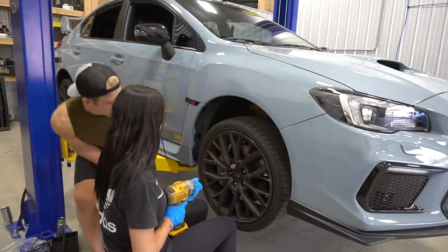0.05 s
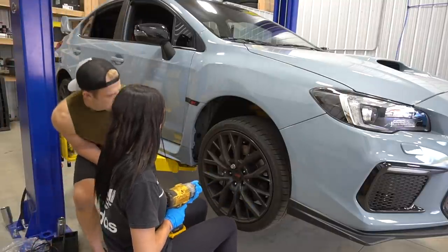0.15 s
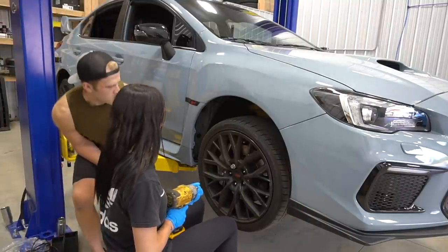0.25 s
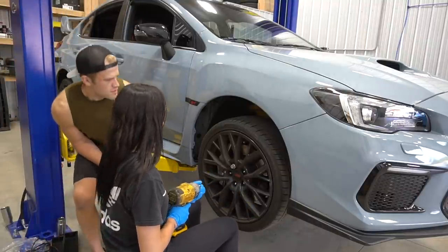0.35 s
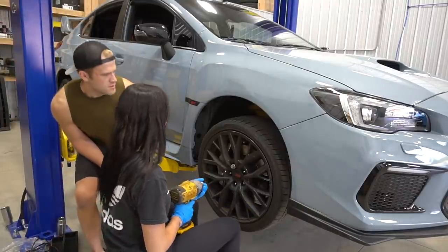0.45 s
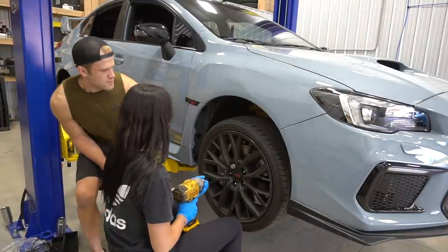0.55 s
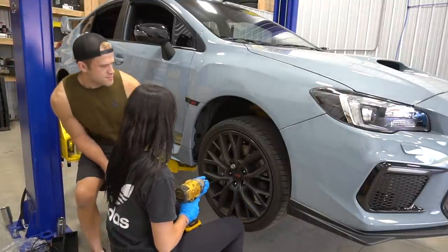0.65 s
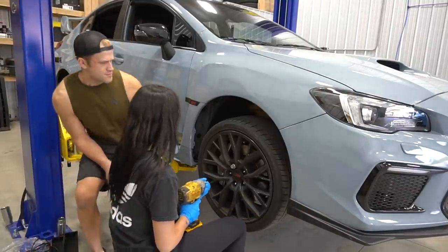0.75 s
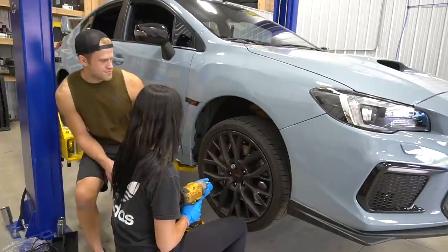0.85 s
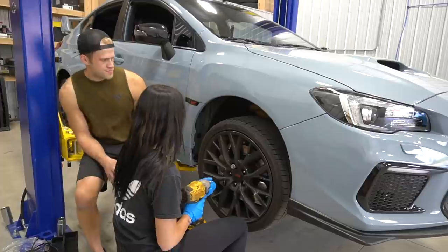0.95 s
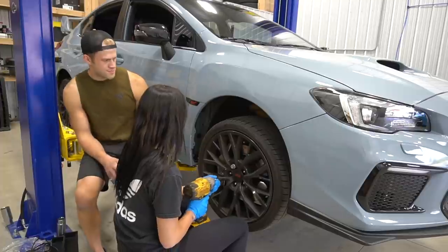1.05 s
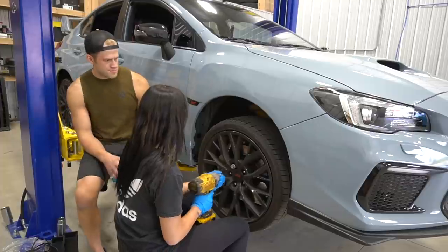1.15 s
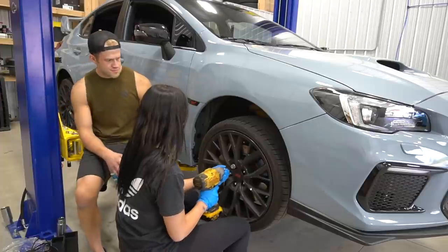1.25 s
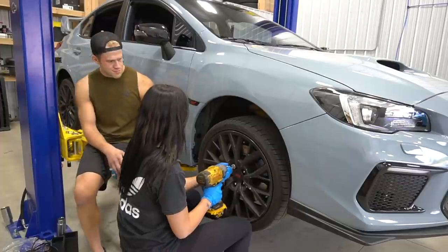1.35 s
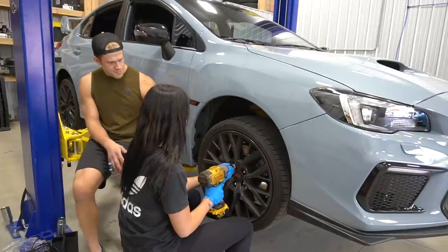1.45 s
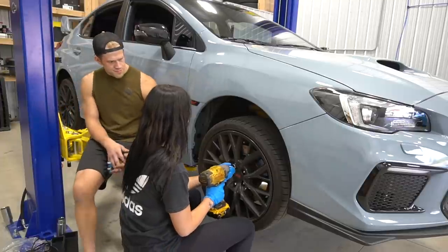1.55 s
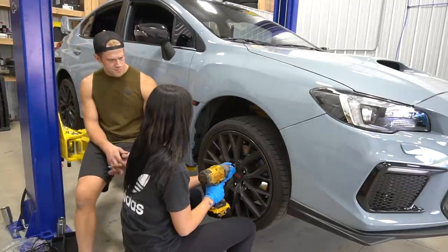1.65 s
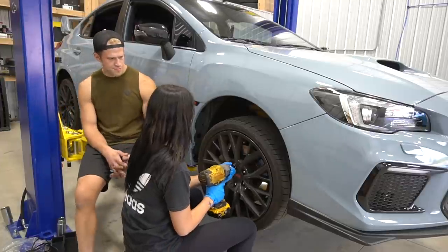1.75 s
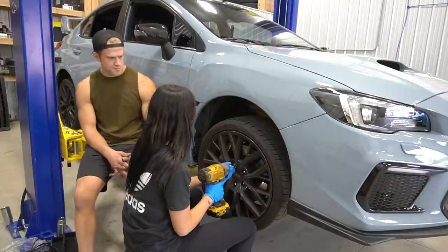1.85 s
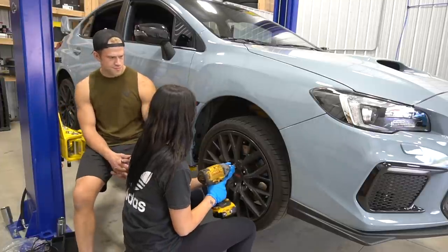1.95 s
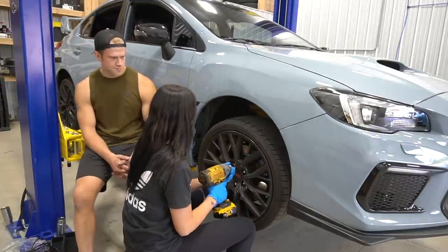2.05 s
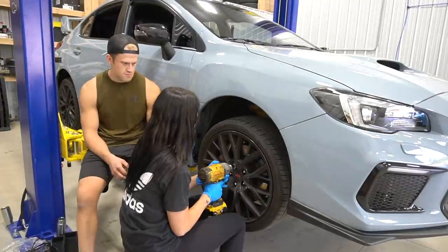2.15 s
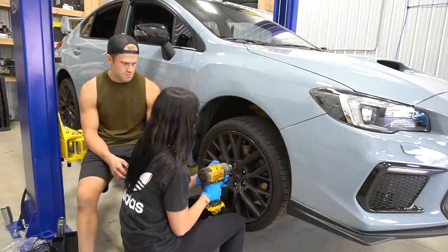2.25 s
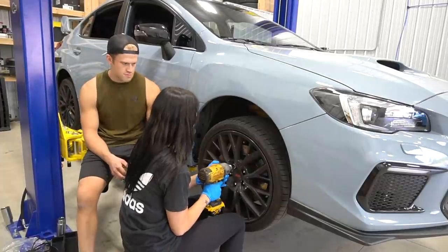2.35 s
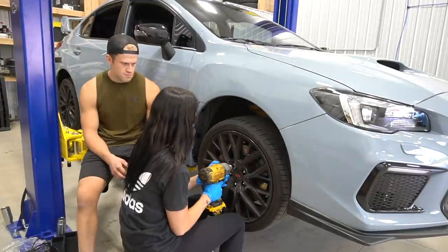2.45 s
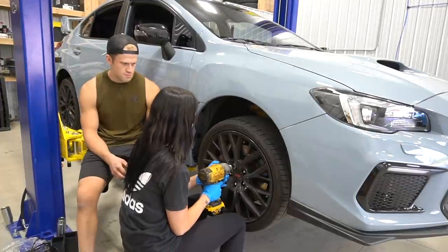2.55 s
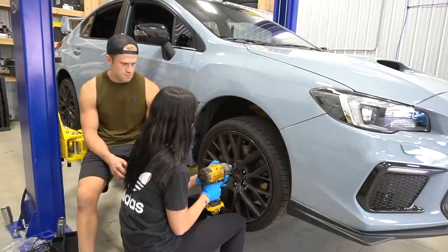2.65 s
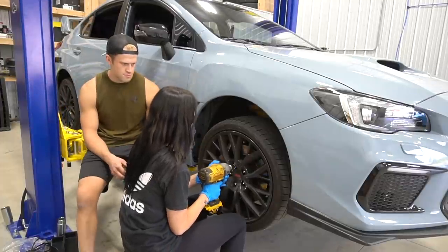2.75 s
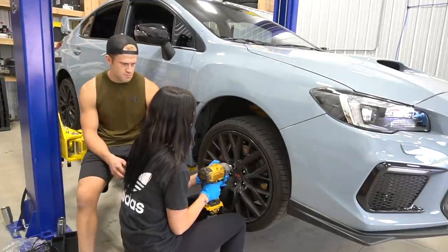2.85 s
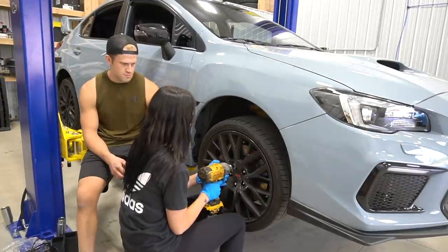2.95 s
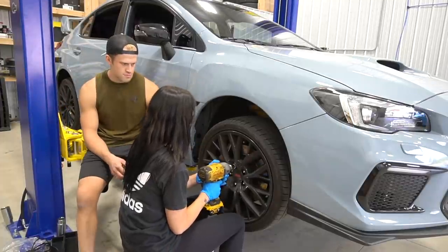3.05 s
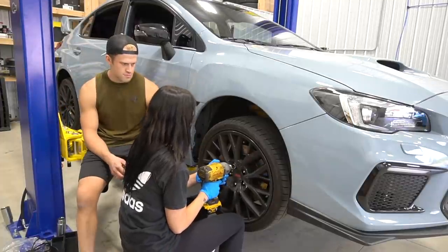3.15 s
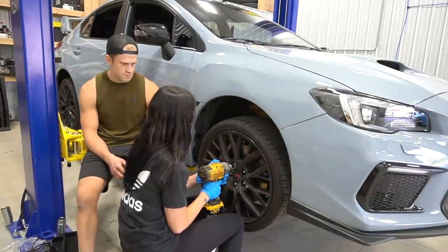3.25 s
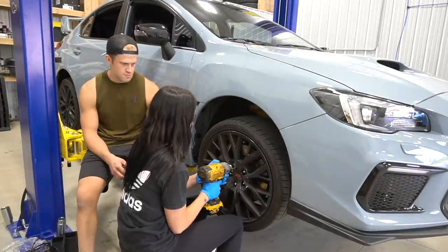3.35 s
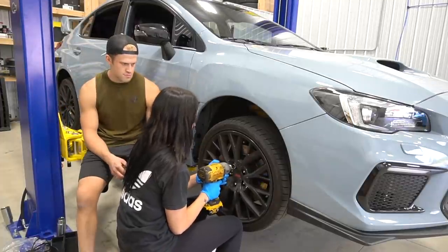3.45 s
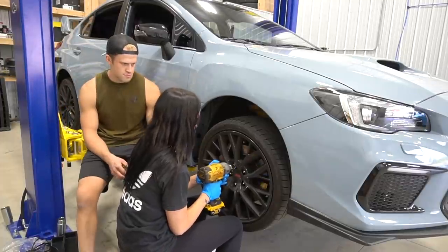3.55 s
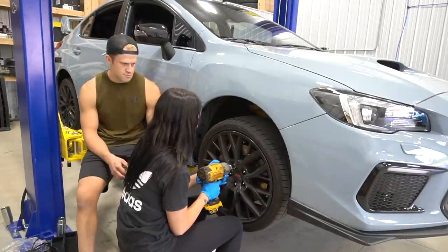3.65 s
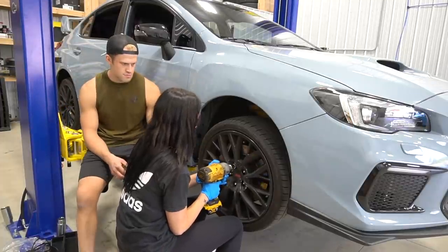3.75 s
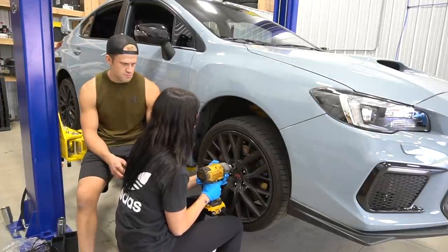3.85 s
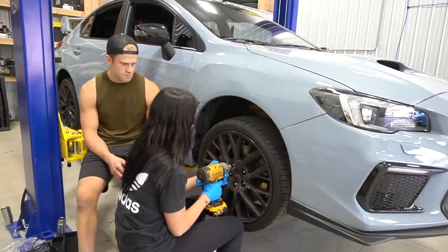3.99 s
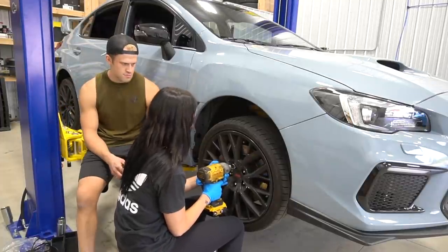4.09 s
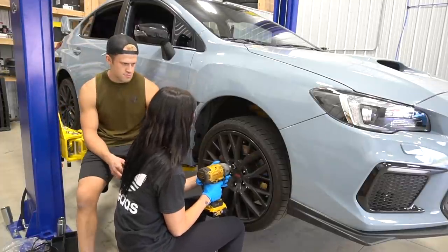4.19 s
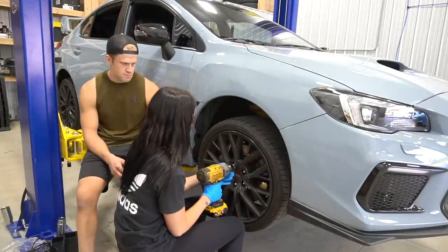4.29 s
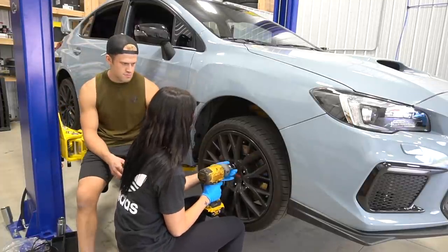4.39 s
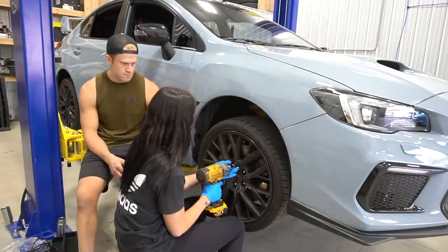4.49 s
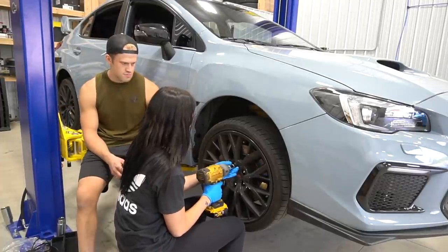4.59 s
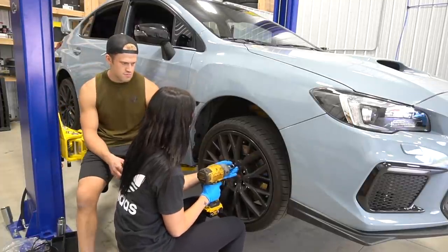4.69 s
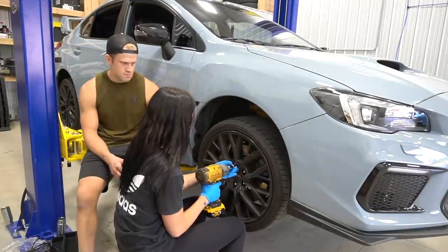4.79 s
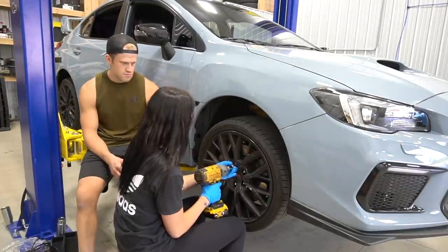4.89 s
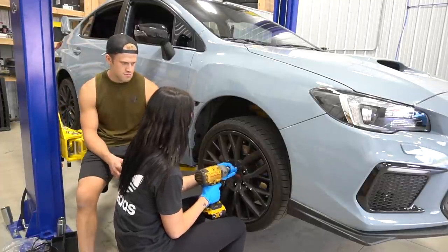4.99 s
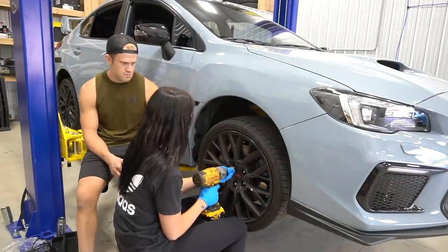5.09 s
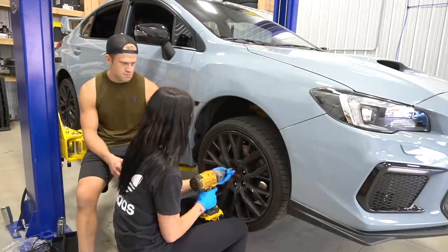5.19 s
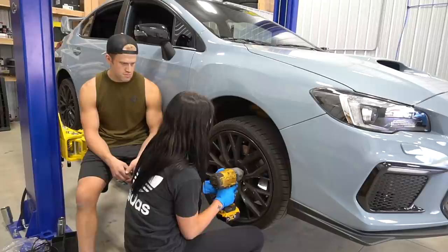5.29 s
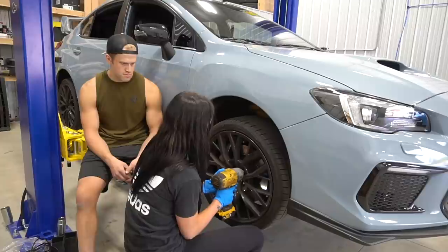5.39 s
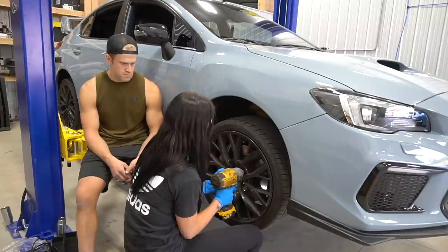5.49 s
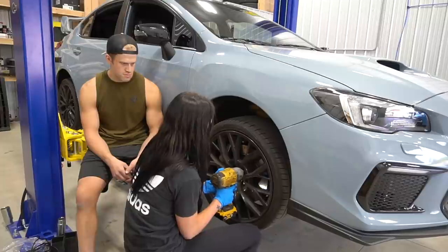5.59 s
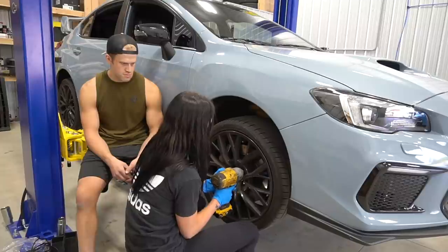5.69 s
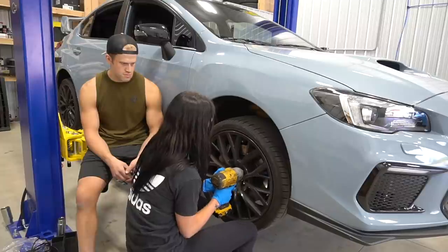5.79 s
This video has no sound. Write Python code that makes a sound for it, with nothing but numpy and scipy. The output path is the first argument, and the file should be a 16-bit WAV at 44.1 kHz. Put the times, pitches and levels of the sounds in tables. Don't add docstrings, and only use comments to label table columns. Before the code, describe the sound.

In a hard-walled garage, an impact wrench hammers wheel nuts in three loud rattling bursts, between ringing metal, small tool knocks and socket scrapes.

```python
import sys
import numpy as np
from scipy import signal
from scipy.fft import rfft, irfft, next_fast_len
from scipy.io import wavfile
from scipy.ndimage import uniform_filter1d

SR = 44100
rng = np.random.default_rng(int(sys.argv[2]) if len(sys.argv) > 2 else 0)


def digitize_waveform(pressure):
    field = np.atleast_2d(pressure).T
    bounded = np.clip(field, -1, 1)
    quanta = np.round(bounded * 32767).astype(np.int16)
    wavfile.write(sys.argv[1], SR, quanta)


def convert_level_to_amplitude(level_db):
    exponent = np.asarray(level_db, float) / 20
    return 10 ** exponent


N = 257103

# start_s, peak_db, brightness_db, socket_ring_hz
FIRST_BURST = [(2.346, -20.5, -16, 1510), (2.354, -21.5, -32, 2480), (2.383, -18, -20, 2670),
               (2.395, -4, -3, 4270), (2.412, -19, -12, 4400), (2.4278, -11, -17, 4940),
               (2.444, -9.5, -0.5, 4080), (2.457, -5, -10, 3350), (2.475, -7, -8, 2440),
               (2.484, -9, -14, 3170), (2.493, -15, 2, 3340), (2.5056, -7.5, -9, 3290),
               (2.524, -5.5, -11, 3170), (2.5369, -6.5, -2.5, 3280), (2.5501, -8.5, -8, 2440),
               (2.5672, -3, -11, 2960), (2.5798, -6.5, -7, 3410), (2.587, -5, -6, 2510),
               (2.596, -9, -8, 2890), (2.6196, -7, -2, 3010), (2.6325, -8, -14, 3350),
               (2.646, -7.5, -2, 3280), (2.665, -14.5, -25, 4600), (2.691, -10, -28, 4500)]
# start_s, peak_db, brightness_db, socket_ring_hz
SECOND_BURST = [(3.195, -13, -18, 2330), (3.238, -1.5, -12.5, 4450), (3.2582, -7.5, -4, 3370),
                (3.2805, -8.5, -3, 3330), (3.2901, -9, -5, 3080), (3.3107, -2.5, -13.5, 3990),
                (3.3243, -8, -8, 3280), (3.338, -5.5, -7, 4660), (3.359, -8.5, 0, 2390),
                (3.3705, -15, -5, 3280), (3.3785, -7, -8.5, 2430), (3.387, -24, -5, 2520),
                (3.408, -12, 2, 1640), (3.42, -8, -13.5, 1990), (3.429, -4, -9.5, 2560),
                (3.4355, -10.5, -6.5, 3020), (3.46, -5.5, -10, 2210), (3.473, -12, -20, 2620),
                (3.482, -5, -3.5, 3070), (3.493, -3.5, -9, 3090), (3.5149, -2.5, -12, 3500),
                (3.529, -5, -13, 2700), (3.537, -9, -1, 3170), (3.546, -11, -5.5, 2450),
                (3.5683, -14.5, 3.5, 3040), (3.5814, -6.5, -15, 3050), (3.595, -5.5, -6, 3060),
                (3.608, -17, -6, 2420), (3.631, -9, -12, 3980)]
# start_s, peak_db, brightness_db, socket_ring_hz
LOOSENING_BLOWS = [(3.673, -2, -8, 4470), (3.702, -5.5, -3, 3240), (3.7114, -8.5, -1, 4940),
                   (3.737, -14, 7, 4400), (3.745, -2.5, -10, 2260), (3.7757, -2.5, -8, 4460),
                   (3.802, -3.5, -9.5, 4150), (3.8293, -3, -11.5, 2190), (3.8592, -4.5, -9.5, 5060),
                   (3.895, -9, -8, 1600)]
# start_s, peak_db, brightness_db, socket_ring_hz
THIRD_BURST = [(5.392, -16.5, -15, 3040), (5.427, -9, -17.5, 2300), (5.459, -3.5, -4, 3430),
               (5.4758, -10, 0, 3260), (5.4865, -11, -6, 2300), (5.491, -26.5, 17, 2600),
               (5.5004, -8.5, -4, 3470), (5.516, -18, 6, 2130), (5.534, -10.5, 0, 2770),
               (5.542, -5, -10, 3100), (5.56, -16.5, 8, 3250), (5.577, -7.5, -7, 2430),
               (5.5845, -16, 8, 2570), (5.607, -4.5, -10, 2000), (5.618, -26, 8, 2020),
               (5.6288, -5.5, -4.5, 3150), (5.64, -25, -10, 2010), (5.652, -8, -12, 4000),
               (5.668, -4.5, -4, 4340), (5.683, -5.5, -9, 4260)]
# start_s, peak_db, brightness_db,
# socket_ring_hz
FURTHER_BLOWS = [(2.399, -22, -1, 2600), (2.4005, -22, -10, 4300), (2.4167, -4, -8, 4620),
                 (2.463, -7.5, -10, 3600), (2.4776, -6.5, -9, 2190), (2.509, -10, -10, 2720),
                 (2.528, -10.5, -12, 3300), (2.6938, -7, -23, 4200), (3.229, -23.5, -16, 2530),
                 (3.33, -6, -8, 3300), (3.438, -12, 0, 3100), (2.599, -13, -5, 2800),
                 (3.242, -2, -12, 3300), (3.677, -5, -9, 2300), (3.682, -9, -13, 4200),
                 (3.7393, -12, -2, 2820), (3.777, -19, -13, 4300), (3.805, -7, -4.5, 2240),
                 (3.832, -24, 9, 3600), (3.896, -11, -17, 2300), (5.5299, -8.5, -7, 3100),
                 (5.573, -10, -14, 2270), (5.687, -8, -15, 2450), (2.679, -15.5, -19, 3000),
                 (2.6998, -10, -22, 3500), (2.708, -21, -17, 3340), (3.2693, -7, -16, 3320),
                 (3.2723, -7.5, -8, 3550), (3.314, -12, -5.5, 3900), (3.3666, -8.5, -12, 3500),
                 (3.518, -13.5, -9, 2800), (3.586, -8, -19, 2950), (3.589, -15.5, -16, 3200),
                 (3.694, -16, -21, 2300), (3.733, -10, -20, 2480), (3.751, -6, -17, 3740),
                 (3.8366, -15, -17, 2580), (3.887, -9.5, -14, 2570), (5.4453, -13, -25, 2800),
                 (5.452, -18, -26, 2970), (5.6935, -11, -12, 3180), (5.748, -8, -24, 2500)]
# pitch_hz, level_db
CRACK_COLOUR = [(60, -56), (200, -20.5), (500, -9.5), (1200, -5), (3000, -5), (5000, -3), (7000, -5.5),
                (16000, -25)]
# start_s, peak_db, ring_hz
ANVIL_PINGS = [(2.401, -22, 14300), (2.497, -20, 14000), (2.632, -22, 14300), (3.326, -24, 12500),
               (3.44, -18.5, 9800), (3.501, -19, 14400), (3.548, -17, 9800), (5.587, -23, 10000),
               (5.686, -17, 14500)]
# pitch_hz, level_db, t60_s
WHEEL_MODES = [(288, -11.5, 0.37), (420, -18, 0.11), (455.7, 0.5, 0.16), (687, -24, 0.76),
               (846.6, -5.5, 0.14), (956, -12.5, 0.12), (1080, -14.5, 0.078), (1600, -14.5, 0.33),
               (1950, -19, 0.78), (2020, -15.5, 0.2), (2250, -27, 0.39), (2530, -14, 0.23),
               (3280, -12, 0.043)]
# on_s, off_s, gear_db, gain_duck_db, run_down_s, gear_treble_db
TRIGGER_PULLS = [
    (2.336, 2.4, -34.5, 12, 0.013, -26),
    (2.394, 2.648, -24, 0.5, 0.047, -6.5),
    (2.676, 2.691, -21.5, -0.5, 0.11, -12),
    (3.183, 3.247, -31.5, -2.5, 0.015, -36),
    (3.242, 3.65, -23.5, 8, 0.075, -8),
    (3.647, 3.882, -26.5, 4.5, 0.14, -16.5),
    (5.389, 5.46, -30, 8, 0.01, -20),
    (5.45, 5.638, -24, -1, 0.62, -6.5),
]
# start_s, peak_below_6500_hz_db, peak_above_db, ring_hz, length_ms
SMALL_KNOCKS = [(0.2425, -37, -44, 3190, 1.1), (0.298, -40, -56, 2580, 1.1), (0.5304, -48, -51, 2020, 0.5),
                (0.6015, -34, -59, 330, 3.5), (0.8579, -50, -72, 260, 2.3), (1.0366, -39, -66, 900, 1.5),
                (1.2973, -38, -60, 700, 1.3), (1.5851, -28, -36, 4910, 1.5), (1.5855, -34, -65, 1900, 1.5),
                (1.6076, -37, -61, 1790, 0.8), (1.7059, -31, -57, 650, 1.5), (1.7375, -31, -70, 330, 5.5),
                (1.589, -34, -60, 4870, 6.5), (0.3, -42, -70, 750, 5.5), (1.7361, -23, -28, 2450, 2.7),
                (2.01, -31, -46, 3200, 1.6), (5.048, -43, -75, 400, 4), (2.3023, -45, -69, 3400, 2.7),
                (2.3273, -37, -70, 3340, 2.3), (4.43, -34, -58, 3290, 2.6), (4.4988, -31, -39, 4740, 2.0),
                (4.6313, -36, -42, 2390, 1.7), (4.729, -31, -42, 3190, 1.5), (4.9164, -29, -36, 2950, 2.0),
                (5.0514, -25, -28, 3290, 1.5), (5.0658, -32, -30, 6480, 1.7), (5.1546, -43, -38, 3230, 0.9),
                (5.3654, -41, -72, 3490, 1.8), (5.3862, -38, -64, 3490, 3.7)]
# start_s, peak_db, ring_hz
SOCKET_TICKS = [(0.1902, -41, 8700), (0.2524, -38, 9100), (4.4524, -43, 9370), (4.485, -36, 9050),
                (4.7222, -37, 9440), (4.7526, -35, 9390), (4.7654, -34, 14300), (4.775, -28, 8000),
                (4.7994, -32, 8700), (4.8214, -40, 9030), (4.8299, -30, 14600), (4.844, -36, 9570),
                (4.8574, -32, 9100), (4.8674, -31, 8370), (4.8874, -29, 8500), (4.9074, -36, 9300),
                (4.9644, -44, 9100), (5.015, -46, 9400), (5.033, -36, 14700), (5.112, -36, 8850),
                (5.1744, -54, 9100)]
# loudest_s, level_db, rise_s, fall_s
SOCKET_SCRAPES = [
    (2.301, -50.5, 0.0034, 0.085),
    (4.45, -40, 0.057, 0.025),
    (4.51, -37.5, 0.043, 0.059),
    (4.72, -39.5, 0.038, 0.063),
    (4.795, -38, 0.067, 0.044),
    (4.86, -36, 0.082, 0.17),
    (5.05, -39, 0.0055, 0.061),
    (5.2, -67, 0.36, 0.063),
]
# time_s, effort_db
HAND_SHUFFLE = [(0, -39.5), (.2, -46.5), (.3, -45), (.454, -51), (.55, -47), (.736, -58.5), (1.03, -63),
                (1.47, -54), (1.52, -46.5), (1.66, -42), (1.715, -49.5), (1.74, -28.5), (1.77, -41),
                (1.92, -46.5), (2.08, -51.5), (2.13, -48.5), (2.22, -54.5)]
# loudest_s, level_db, rise_s, fall_s
GLOVE_BRUSHES = [
    (.02, -54, 0.038, 0.12),
    (.27, -59, 0.058, 0.026),
    (.57, -50, 0.05, 0.06),
    (1.51, -55.5, 0.037, 0.039),
    (1.75, -60, 0.0041, 0.061),
]
# start_s, pitch_hz, width_hz, level_db, t60_s
STEEL_RINGS = [(-.2, 2635, 95, -24, 1.18), (-.1, 4700, 250, -45.5, 1.8), (-.05, 486, 82, -56, 2),
               (-.1, 1230, 50, -39, 0.58), (-.1, 6000, 120, -50, 1.7), (-.1, 6660, 90, -49, 1.6),
               (-.1, 9300, 810, -38, 0.85), (.58, 420, 170, -46, 0.54), (5.352, 338, 130, -50, .6),
               (4.66, 3300, 500, -34, 1.1), (1.05, 6540, 76, -63.5, 2.3), (1.57, 4900, 150, -44, 0.27),
               (1.7, 322, 71, -45, 0.41), (1.74, 1760, 260, -35, 0.65), (1.74, 440, 30, -43.5, 0.65),
               (2.293, 3360, 350, -40, 0.82), (2.345, 834, 160, -34, 0.82), (2.34, 430, 81, -37, 0.69),
               (2.7, 214, 19, -48, 1.02), (3.82, 1584, 28, -26.5, 0.92), (3.85, 2450, 45, -40, 1.2),
               (3.85, 2080, 30, -42, 0.96), (4.2, 519, 11, -52, 1.7), (4.3, 1102, 110, -48, 1.7),
               (4.68, 930, 170, -40.5, 0.92)]
# start_s, pitch_hz, width_hz, level_db, rise_s
DRAGGED_RINGS = [
    (1.08, 2060, 140, -46.5, 0.5),
    (0.82, 2150, 250, -58, 0.18),
    (1.24, 860, 150, -54.5, 0.16),
    (1.23, 300, 35, -58.5, 0.15),
    (1.1, 3500, 250, -65, 0.37),
    (0.95, 3160, 200, -64, 0.28),
]
# loudest_s, level_db, rise_s, fall_s
THUMPS = [(.1, -62, 0.051, 0.027), (.41, -71, 0.031, 0.048), (.6, -56, 0.015, 0.15),
          (1.12, -65, 0.075, 0.13), (2.15, -75, 0.088, .05), (2.36, -62, 0.043, .05),
          (1.77, -48.5, 0.074, 0.17), (2.57, -48, 0.05, 0.033), (2.74, -48, 0.032, 0.1),
          (3.31, -44, 0.021, 0.29), (3.93, -49.5, 0.16, 0.09), (4.35, -67, 0.04, 0.13),
          (5.4, -68.5, 0.046, 0.049), (5.72, -50, 0.022, 0.023)]
RUMBLE_BY_SHOT = (-65.5, -75, -54.5)
# pitch_hz, level_db
AIR_COLOUR = [(100, -60), (200, -3.5), (500, -5), (1500, -9.5), (4000, -24.5), (6000, -17.5), (16000, -17)]
# start_s, end_s, floor_db, room_db
SHOT_LIST = [
    (0, 2.216, -57.5, -14),
    (2.216, 5.352, -78, -5),
    (5.352, 5.84, -71, -6),
]
# pitch_hz, t60_s
GARAGE_T60 = [(100, 0.32), (400, 0.8), (1500, 1.14), (3500, 1.37), (6000, 0.92), (10000, 0.51),
              (12500, 0.31), (16000, 0.19)]
# pitch_hz, likeness_0_to_1
CHANNEL_LIKENESS = [(100, .985), (400, .988), (700, .92), (1400, .84), (3000, .53), (6000, .24),
                    (10000, .22), (14000, .45)]
# pitch_hz, left_minus_right_db
STEREO_LEAN = [(60, -.5), (110, -2.2), (200, -1.0), (380, -2.5), (700, 0), (1290, -0.5), (2380, -1),
               (4400, 0.5), (8120, 2), (15000, 0.5)]

TIME_S = np.arange(N) / SR


def hammer_blows():
    arrival_s = .0013
    contact_ms, contact_spread = 0.98, 0.069
    table = FIRST_BURST + SECOND_BURST + LOOSENING_BLOWS + THIRD_BURST + FURTHER_BLOWS
    s, db, bright_db, hz = np.transpose(table)
    length_ms = contact_ms * np.exp(contact_spread * rng.standard_normal(len(s)))
    rows = np.transpose([s + arrival_s, db, db + bright_db, hz, length_ms])
    return hits(rows, stretch=0.79, rattle_ms=11.6, rattle_db=-14.5, ring_db=1.0, width=0.17,
                low_db=-0.55, top_db=5.0, reach=9.1)


def hits(table, stretch, rattle_ms, rattle_db, ring_db, width, low_db, top_db, reach, size=2048):
    s, body_db, treble_db, ring_hz, length_ms = (c[:, None] for c in np.transpose(table))
    ms = np.arange(size) / SR * 1000
    noise = rng.standard_normal((len(table), 4, size))
    zing_hz = 9600 * np.exp(0.054 * noise[:, 3, :1])

    def crack_gain(f):
        return convert_level_to_amplitude(on_log(f, CRACK_COLOUR)) / (1 + (f / (reach * ring_hz)) ** 2)

    def ring_gain(f):
        return 1 / np.sqrt(1 + ((f - ring_hz) / (width * ring_hz)) ** 4)

    def treble_gain(f):
        fixed_zing = 0.28 / (1 + ((f - 14400) / 500) ** 2)
        own_zing = 0.88 / (1 + ((f - zing_hz) / 700) ** 2)
        return band(6500, 18000)(f) ** 2 * (1 + fixed_zing + own_zing)

    def peaked(x):
        return x / np.abs(x).max(axis=1, keepdims=True)

    decay = np.exp(-ms / (stretch * length_ms)) + convert_level_to_amplitude(rattle_db) * np.exp(-ms / rattle_ms)
    shape = (1 - np.exp(-ms / 0.17)) * decay
    body = shaped(noise[:, 0], crack_gain)
    ring = shaped(noise[:, 1], ring_gain)
    ring = 0.66 * ring + 0.92 * np.sin(2 * np.pi * ring_hz * ms / 1000)
    top = shaped(noise[:, 2], treble_gain)
    rows = peaked(shape * (body + convert_level_to_amplitude(ring_db) * ring)) * convert_level_to_amplitude(body_db + low_db)
    rows = rows + peaked(shape ** 1.12 * top) * convert_level_to_amplitude(treble_db + top_db)
    out = np.zeros(N + size)
    for start, row in zip((s[:, 0] * SR).astype(int), rows):
        out[start:start + size] += row
    return signal.sosfilt(signal.butter(2, 130, "high", fs=SR, output="sos"), out[:N])


def anvil_pings():
    return hits(thin(ANVIL_PINGS, length_ms=4.0), stretch=1.1, rattle_ms=8.0, rattle_db=-25, ring_db=31,
                width=0.023, low_db=5.5, top_db=-23, reach=9)


def thin(table, length_ms):
    s, db, hz = np.transpose(table)
    return np.transpose([s, db - 2.5, db - 13, hz, length_ms + 0 * s])


def wheel_ring(push):
    wander = .015
    waver_db = 3.5
    out = 0
    for hz, db, t60 in WHEEL_MODES:
        pole = np.exp(2j * np.pi * hz / SR - np.log(1000) / (t60 * SR))
        level = convert_level_to_amplitude(db + waver_db * walk(40))
        turning = np.exp(2j * np.pi * np.cumsum(wander * hz * walk(30)) / SR)
        out = out + level * (signal.lfilter([1], [1, -pole], push) * turning).imag
    return convert_level_to_amplitude(-41.0) * out


def gear_whirr():
    return rubbing(motor(), treble_db=-28, harden=0.91, extra=motor(bright=True), bass_db=-11.0, grain_db=5.5,
                   flicker_db=2.5, hum_hz=3350, hum_db=0.5, width_hz=1700)


def motor(bright=False):
    spin_up_s, sag_db_per_s = 0.013, 9
    out = 1e-6
    for on, off, db, _, run_down, treble_db in TRIGGER_PULLS:
        level_db = db + bright * treble_db - sag_db_per_s * np.clip(TIME_S - on, 0, off - on)
        spin_up = 1 - np.exp(-np.maximum(TIME_S - on, 0) / spin_up_s)
        spin_down = np.exp(-np.maximum(TIME_S - off, 0) * (1 + 0.9 * bright) / run_down)
        out = out + convert_level_to_amplitude(level_db) * spin_up * spin_down
    return out


def rubbing(gain, treble_db, harden, bass_db, grain_db, flicker_db, hum_hz, hum_db, width_hz,
            extra=0, edge_hz=5500):
    treble = convert_level_to_amplitude(treble_db) * gain * (gain / gain.max()) ** harden + extra
    grains = uniform_filter1d(rng.exponential(1, N), size=40)
    grains = convert_level_to_amplitude(grain_db * grains + flicker_db * walk(60))
    grains = grains / np.sqrt(np.mean(grains ** 2))

    def middle_gain(f):
        return band(1400, edge_hz)(f) ** 2 * (1 + convert_level_to_amplitude(hum_db) / (1 + ((f - hum_hz) / width_hz) ** 2))

    def treble_gain(f):
        return band(5500, 14000)(f) ** 2

    parts = [(gain, middle_gain), (treble, treble_gain), (convert_level_to_amplitude(bass_db) * gain, band(400, 1460))]
    return sum(level * shaped(grains * rng.standard_normal((2, N)), colour) for level, colour in parts)


def handling_knocks():
    return hits(SMALL_KNOCKS, stretch=1.56, rattle_ms=34.0, rattle_db=-22.0, ring_db=4.5, width=0.23,
                low_db=2.0, top_db=2.0, reach=4.1)


def socket_ticks():
    return hits(thin(SOCKET_TICKS, length_ms=0.9), stretch=1.1, rattle_ms=7.2, rattle_db=-11, ring_db=14,
                width=0.16, low_db=4.5, top_db=-3.0, reach=8.2)


def socket_scrape():
    gain = strokes(SOCKET_SCRAPES) * (TIME_S < SHOT_LIST[1][1]) + 1e-6
    return rubbing(gain, treble_db=-4.5, harden=1.6, bass_db=-15.5, grain_db=14.5, flicker_db=1.3,
                   hum_hz=3330, hum_db=-8.0, width_hz=82)


def strokes(table):
    out = 1e-6
    for s, db, rise, fall in table:
        out = out + convert_level_to_amplitude(db) * np.exp(-np.abs(TIME_S - s) / np.where(TIME_S < s, rise, fall))
    return out


def hand_shuffle():
    first = TIME_S < SHOT_LIST[0][1]
    effort = convert_level_to_amplitude(np.interp(TIME_S, *np.transpose(HAND_SHUFFLE))) * first
    return rubbing(effort, treble_db=-20.5, harden=0.098, bass_db=-8, grain_db=10.5, flicker_db=1.05,
                   hum_hz=2120, hum_db=-9.5, width_hz=420, edge_hz=5480, extra=strokes(GLOVE_BRUSHES) * first)


def steel_rings():
    struck_rise_s, dragged_t60_s = .05, 4.6
    rows = [(*r[:4], struck_rise_s, r[4]) for r in STEEL_RINGS]
    rows += [(*r, dragged_t60_s) for r in DRAGGED_RINGS]
    out = 0
    for start, hz, width_hz, db, rise, t60 in rows:
        age = np.maximum(TIME_S - start, 0)
        noise = shaped(rng.standard_normal((2, N)), lambda f: 1 / (1 + ((f - hz) / width_hz) ** 2))
        end = min(shot[1] for shot in SHOT_LIST if shot[1] > start)
        out = out + (TIME_S < end) * noise * convert_level_to_amplitude(db - 60 * age / t60) * (1 - np.exp(-age / rise))
    return out


def rumble():
    noise = shaped(rng.standard_normal((2, N)),
                   lambda f: band(36, 170)(f) ** 2 * (1 + 2.5 / (1 + ((f - 125) / 25) ** 2)))
    floor = 0
    for shot, db in zip(SHOT_LIST, RUMBLE_BY_SHOT):
        floor = floor + convert_level_to_amplitude(db) * (TIME_S >= shot[0]) * (TIME_S < shot[1])
    return stereo(*noise) * convert_level_to_amplitude(-3.5) * (floor + strokes(THUMPS))


def tyre_hum():
    start_s, pitch_hz, level_db, fade_db_per_s = 4.02, 254, -57.5, 9.5
    age = np.maximum(TIME_S - start_s, 0)
    tone = np.sqrt(2) * np.sin(2 * np.pi * pitch_hz * TIME_S) * (1 - np.exp(-age / 0.026))
    return tone * convert_level_to_amplitude(level_db - fade_db_per_s * age + 2.9 * walk(25)) * (TIME_S < SHOT_LIST[1][1])


def garage_air():
    noise = shaped(rng.standard_normal((2, N)), lambda f: convert_level_to_amplitude(on_log(f, AIR_COLOUR)))
    return stereo(*noise) * convert_level_to_amplitude(0.4 * walk(1.4))


def room(seconds=2.2):
    t = np.arange(int(seconds * SR)) / SR
    out = 0
    for hz in 50 * 2 ** np.arange(0, 8.6, .5):
        noise = shaped(rng.standard_normal((2, len(t))),
                       lambda f: np.exp(-(np.log2((f + 1) / hz) / 0.36) ** 2))
        t60 = on_log(hz, GARAGE_T60)
        out = out + noise * np.sqrt(hz / t60) * np.exp(-np.log(1000) * t / t60)
    out = stereo(*(out * (1 - np.exp(-t / 0.018))))
    return out / np.sqrt(np.mean(np.sum(out ** 2, axis=1)))


def gain_control():
    rest_db, recover_s = 6.5, 0.16
    held_db, release_s = 4.5, 0.073
    shock, held = 0, 0
    for on, off, _, duck, *_ in TRIGGER_PULLS:
        shock = shock + duck * (TIME_S >= on) * np.exp(-np.maximum(TIME_S - on, 0) / recover_s)
        held = np.maximum(held, (TIME_S >= on) * np.exp(-np.maximum(TIME_S - off, 0) / release_s))
    return convert_level_to_amplitude(rest_db - shock - held_db * held)


def on_log(hz, table):
    f, v = np.transpose(table)
    return np.interp(np.log(hz + 1), np.log(f), v)


def shaped(x, gain):
    n = next_fast_len(x.shape[-1])
    y = irfft(rfft(x, n) * gain(np.fft.rfftfreq(n, 1 / SR)), n)[..., :x.shape[-1]]
    return y / np.sqrt(np.mean(y ** 2, axis=-1, keepdims=True))


def band(lo_hz, hi_hz):
    return lambda f: (f / lo_hz) ** 2 / np.sqrt((1 + (f / lo_hz) ** 4) * (1 + (f / hi_hz) ** 4))


def walk(rate_hz):
    k = int(SR / rate_hz)
    return uniform_filter1d(np.repeat(rng.standard_normal(N // k + 1), k), k)[:N]


def stereo(mid, side):
    n = next_fast_len(len(mid))
    like = np.clip(on_log(np.fft.rfftfreq(n, 1 / SR), CHANNEL_LIKENESS), 0, 1)
    m = rfft(mid, n) * np.sqrt((1 + like) / 2)
    s = rfft(side, n) * np.sqrt((1 - like) / 2)
    return irfft(np.array([m + s, m - s]), n)[:, :len(mid)]


def scene():
    blows = hammer_blows()
    knocks = handling_knocks() + socket_ticks() + anvil_pings()
    gears = gear_whirr()
    rub = gears + socket_scrape() + steel_rings() + hand_shuffle()
    air, response, lift = garage_air(), room(), gain_control()
    out = np.zeros((2, N))
    for start, end, floor_db, room_db in SHOT_LIST:
        on = uniform_filter1d(1. * (TIME_S >= start) * (TIME_S < end), size=64)
        near = (blows + knocks) * on + wheel_ring((blows + 0.34 * knocks) * on)
        direct = np.array([near, near]) + 0.2 * np.gradient(np.roll(near, 9)) * np.array([[1], [-1]])
        send = near - 0.69 * knocks * on + on * (0.69 * gears[0] + 0.23 * rub[0])
        wet = signal.fftconvolve(send[None], response)[:, :N]
        out += on * (direct + convert_level_to_amplitude(room_db) * lift * wet + convert_level_to_amplitude(floor_db) * air)
    return out + stereo(*rub) + rumble() + tyre_hum()


def top_cut(x):
    return signal.sosfilt(signal.butter(12, 16660, fs=SR, output="sos"), x)


def record(dry):
    n = next_fast_len(N)
    lean_db = on_log(np.fft.rfftfreq(n, 1 / SR), STEREO_LEAN) / 2
    leaning = irfft(rfft(dry, n) * convert_level_to_amplitude([lean_db, -lean_db]), n)[:, :N]
    soft = np.tanh(.4 * leaning) / .4
    mix = signal.sosfilt(signal.ellip(8, .2, 48, 15550, fs=SR, output="sos"), soft)
    return top_cut(mix)


dry = scene()
out = record(dry)
digitize_waveform(out)
```